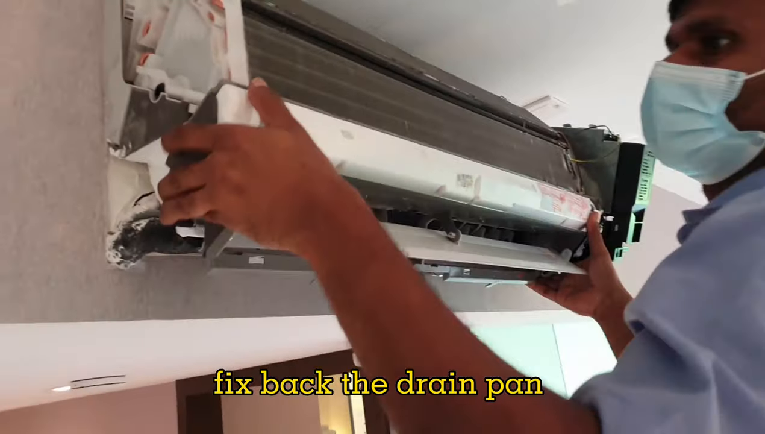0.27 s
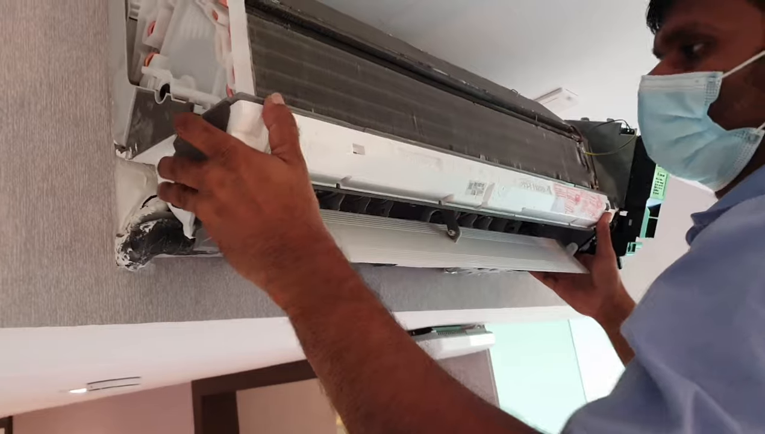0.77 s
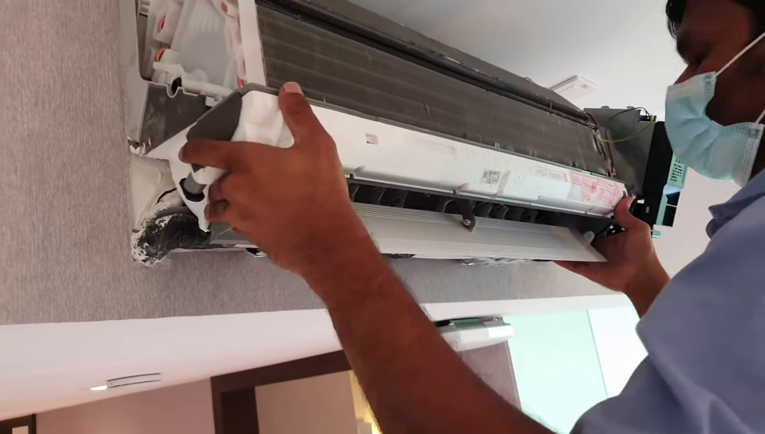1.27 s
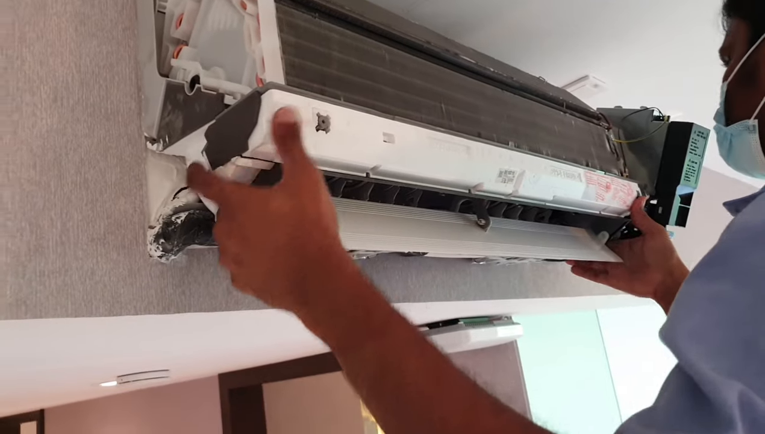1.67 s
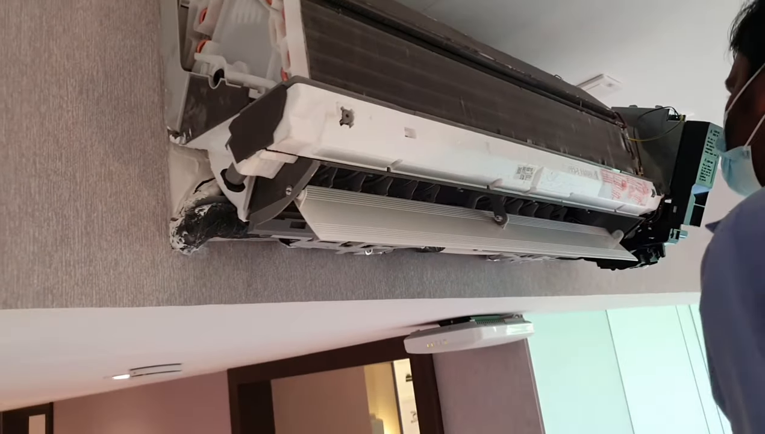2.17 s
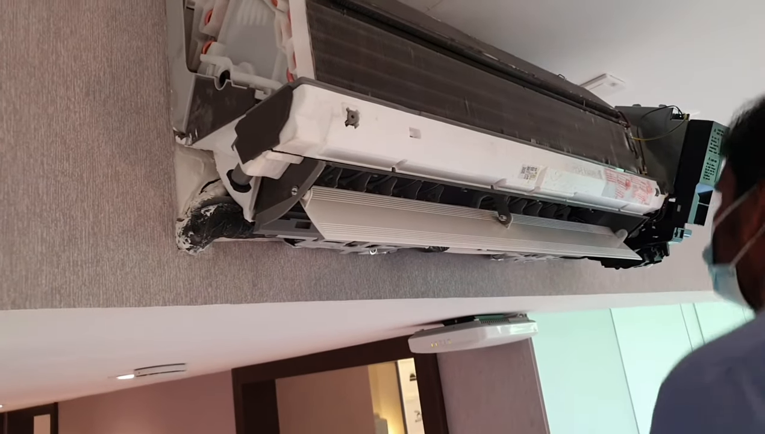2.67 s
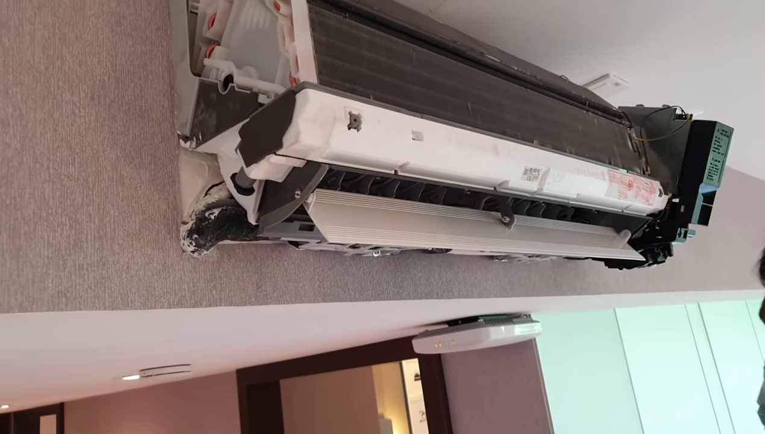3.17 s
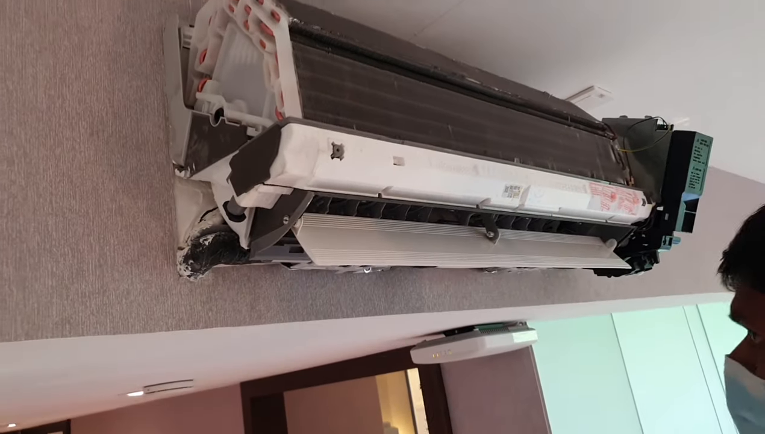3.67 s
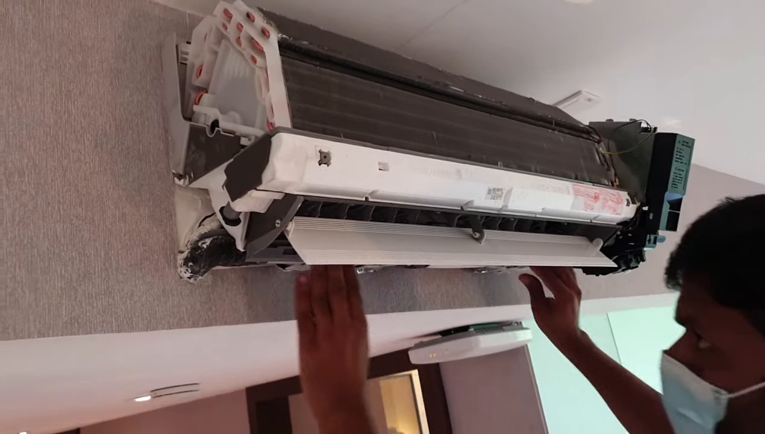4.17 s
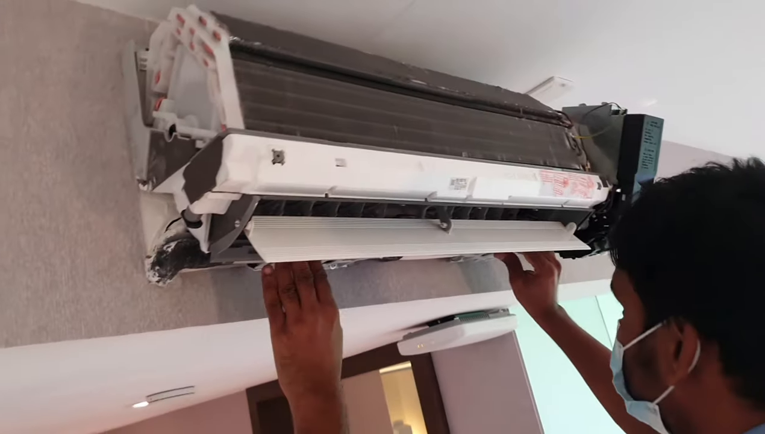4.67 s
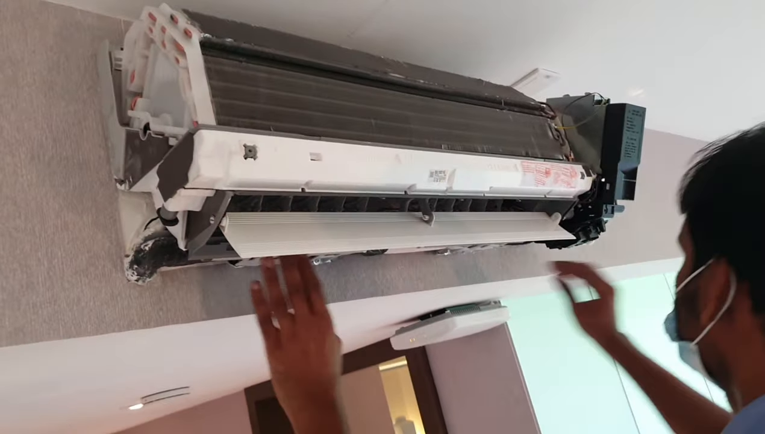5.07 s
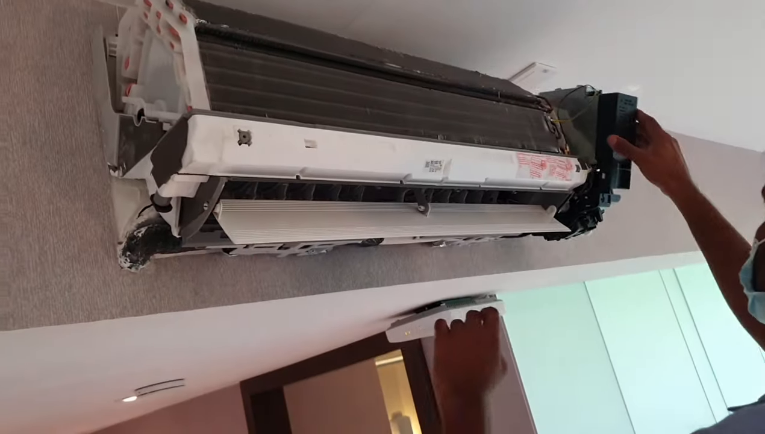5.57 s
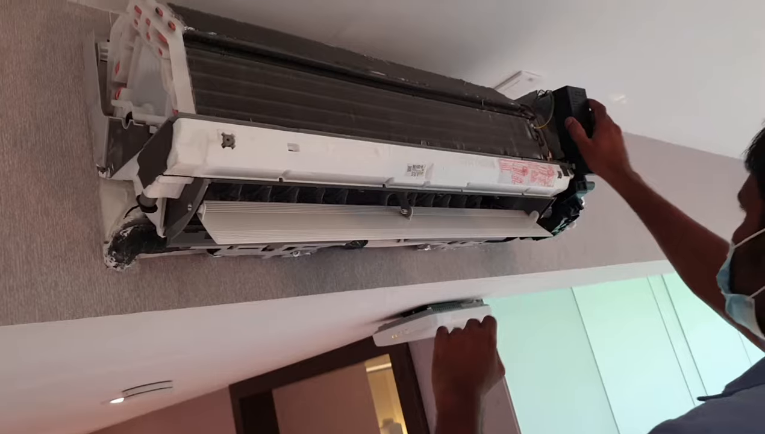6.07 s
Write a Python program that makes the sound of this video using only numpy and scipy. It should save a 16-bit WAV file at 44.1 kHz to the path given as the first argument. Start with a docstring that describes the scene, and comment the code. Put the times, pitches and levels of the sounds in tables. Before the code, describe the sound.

Close to the microphone, plastic casing parts clack and snap hard, with body booms and a grainy scrape, then settle into tiny creaking ticks. After a quiet gap, a ladder knocks dully as weight shifts, with shuffling rubs. Soft fingertip taps and small clicks end it. A wavering low hum and faint hiss lie beneath, in a short live room reverberation, brighter on the left.

```python
"""In a hard-walled room, a plastic drain pan is pushed and snapped into a wall air conditioner, then pressed
and fingered along its edge. Contacts are noise bursts filtered by casing modes; rubs are grainy friction noise.
A metal part pings and low modes boom under shoves; the fitter's stepladder knocks as he shifts his weight.
A wavering low hum and shaped noise lie beneath, with diffuse tails; most of the spectrum is louder on the left."""
import sys
import numpy as np
from scipy import signal
from scipy.fft import rfft, irfft, next_fast_len
from scipy.io import wavfile
from scipy.ndimage import map_coordinates

SR = 44100
rng = np.random.default_rng(int(sys.argv[2]) if len(sys.argv) > 2 else 0)


def inscribe(sig):
    """Save sig as 16-bit PCM at rate SR to the path in sys.argv[1].

    A 1-D sig is mono; a 2-D sig holds one channel per row.
    Samples are clipped to [-1, 1] before scaling.
    """
    pcm = np.round(np.clip(np.atleast_2d(sig).T, -1, 1) * 32767)
    wavfile.write(sys.argv[1], SR, pcm.astype(np.int16))


N = 278712
T = np.arange(int(0.7 * SR)) / SR  # time axis of one event and its tail (s)

# Bands in which contact levels are set: lower edge f/Hz, upper edge f/Hz
BANDS_HZ = [(205, 700), (700, 2000), (2000, 6000), (6000, 15500)]
# Resonances of the casing: f/Hz, width/Hz, relative level/dB
CASING_MODES = [(329, 6.1, -5.5), (445, 65, 4.5), (590, 8, 0), (764.6, 21, -6), (938, 38, -3.5),
                (1120, 140, -2), (1308, 190, 0.5), (1576, 230, -1), (1860, 40, -3.5), (2075, 45, -5.5),
                (2330, 230, -7.5), (2730, 55, -7.5), (3020, 150, -5.5), (3420, 720, -5)]

BAND_OCTAVES = np.log2(np.sqrt(np.prod(BANDS_HZ, axis=1)) / 1950)  # band centres, octaves from 1950 Hz
BAND_FILTERS = [signal.butter(4, edges, "band", fs=SR, output="sos") for edges in BANDS_HZ]


def amp(db):
    """Amplitude ratio of a level: twenty decibels are a factor of ten."""
    return 10 ** (np.asarray(db) / 20)


def rms(x):
    """Root mean square: the effective amplitude of a signal."""
    return np.sqrt(np.mean(x ** 2) + 1e-20)


def along(points, hz):
    """Linear interpolation of (f/Hz, value) points on a logarithmic frequency axis."""
    f, values = np.transpose(points)
    return np.interp(np.log(hz + 1), np.log(f), values)


def add(track, s, x):
    """Superposition: sounds sum linearly; x joins the track at time s."""
    start = max(0, round(s * SR))
    track[:, start:start + x.shape[-1]] += x[..., :N - start]


def wobble(rate):
    """Band-limited random fluctuation: a smooth curve through rate random knots a second."""
    knots = rng.standard_normal(int(N * rate / SR) + 4)
    return map_coordinates(knots, [np.arange(N) * rate / SR])


def filtered(x, response):
    """Linear filtering: the spectrum is multiplied by a complex frequency response."""
    n = x.shape[-1]
    padded = next_fast_len(n + 4096)
    spectrum = rfft(x, padded) * response(np.fft.rfftfreq(padded, 1 / SR))
    return irfft(spectrum, padded)[..., :n]


def resonances(modes, f):
    """Modal superposition: the causal response of damped resonators (f/Hz, width/Hz, level/dB)."""
    response = 0
    for centre, width, db in modes:
        damping = 1j * f * width
        response = response + amp(db) * damping / (centre * centre - f * f + damping)
    return response


def spread(pair):
    """Interchannel coherence: two unrelated signals become a left and right alike to a set degree."""
    # likeness of left and right: f/Hz, coherence
    coherence = [(100, 1), (250, 0.35), (500, 0.99), (1500, 0.13), (10000, 0.24)]

    def mid_side_gains(hz):
        angle = np.arccos(np.clip(along(coherence, hz), -1, 1)) / 2
        return np.array([np.cos(angle), np.sin(angle)])

    mid, side = filtered(pair, mid_side_gains)
    return np.array([mid + side, mid - side])


def room_tail():
    """Diffuse reverberation: unit-energy noise builds up in milliseconds and dies sooner in the treble."""
    # the room's decay: f/Hz, t60/s
    room_decay = [(200, 0.63), (600, 0.51), (2500, 0.44), (6000, 0.42), (14000, 0.36)]
    hz, t, noise = signal.stft(rng.standard_normal((2, len(T))), SR, nperseg=256)
    buildup = 1 - np.exp(-t / 0.0012)
    decay = amp(-60 * t / along(room_decay, hz)[:, None])
    tail = signal.istft(noise * decay * buildup, SR, nperseg=256)[1][:, :len(T)]
    return tail / np.linalg.norm(tail[0])


def in_room(x, wet_db):
    """Convolution reverberation: x is joined by its response in a freshly drawn tail."""
    reverb = signal.fftconvolve(x, room_tail(), axes=1)[:, :len(T)]
    return spread(x + amp(wet_db) * reverb)


def strike(t60, rise, wet_db):
    """High modal density: a struck panel is quickly damped noise, melting into the room's tail."""
    envelope = amp(-60 * T / t60) * (1 - np.exp(-T / rise))
    burst = rng.standard_normal((2, len(T))) * envelope
    return spread(burst / np.linalg.norm(burst[0]) + amp(wet_db) * room_tail())


def band_levels(db, tilt_db, arch_db):
    """Contact spectrum: the level is tilted by hardness and arched over the middle bands."""
    curvature = BAND_OCTAVES ** 2 - np.mean(BAND_OCTAVES ** 2)
    return db + tilt_db * BAND_OCTAVES - arch_db * curvature


def coloured(x, levels_db, length):
    """Band equalization: each band is set to its level over the first length seconds."""
    out = 0
    for db, sos in zip(levels_db, BAND_FILTERS):
        band = signal.sosfilt(sos, x)
        out = out + amp(db) * band / rms(band[:, :int(length * SR)])
    return out


def background():
    """Amplitude and phase modulation: a low tone wavers over spectrally shaped rumble and hiss."""
    # slow swell of the hum, before a lift of 4.5 dB: t/s, level/dB
    hum_swell = [(0.0, -42), (2.15, -46.5), (3.1, -39.5), (4.3, -45), (4.8, -41.5), (6.32, -43.5)]
    # room rumble and air, with a faint whistling band near 2.3 kHz: f/Hz, relative level/dB per Hz
    air_spectrum = [(20, -34), (35, -9), (52, 1.5), (90, -3), (110, -1.5), (138, -9.5), (320, -18),
                    (520, -23), (800, -29.5), (1000, -34.5), (2120, -43), (2340, -37), (2580, -47),
                    (16000, -57)]
    hum_hz = 76.2
    s, db = np.transpose(hum_swell)
    t = np.arange(N) / SR
    waver = amp(1.8 * wobble(11))
    phase = 2 * np.pi * hum_hz * t + 0.56 * wobble(5.8)
    hum = amp(np.interp(t, s, db) + 4.5) * waver * np.sin(phase)
    air = filtered(spread(rng.standard_normal((2, N))), lambda hz: amp(along(air_spectrum, hz)))
    return hum + amp(-44) * air / rms(air)


def knocks():
    """Impact on a hollow frame: a dull stepladder burst is joined by one note that rings on."""
    # knocks of the stepladder: t/s, clack level/dB, tilt/dB per octave, note level/dB, ring f/Hz
    knock_events = [(2.494, -44, 0, -42, 626), (2.861, -63, -4.5, -56, 1313), (3.057, -41, -3.5, -34, 761),
                    (3.091, -50.5, -3.5, -32.5, 750), (3.137, -43.5, -4, -37, 564),
                    (3.254, -62, -11, -30.5, 483), (3.603, -56, -6, -52.5, 1170),
                    (3.645, -45.5, 0.5, -31, 620), (3.7498, -37, 1.84, -32, 1190),
                    (3.935, -58, -2.5, -63.5, 1316), (3.999, -59.5, -7.5, -36.5, 479),
                    (5.849, -58.5, -7.5, -46, 574)]
    # resonances of the ladder's frame: f/Hz, width/Hz, relative level/dB
    ladder_modes = [(831, 125, -6.5), (1190, 170, -0.5), (1520, 79, -6), (1905, 23, -23), (2260, 46, -14)]
    arch_db, note_t60_s = 1.5, 0.25  # arch in dB per octave squared
    out = np.zeros((2, N))
    for s, db, tilt_db, note_db, ring_hz in knock_events:
        body = [(ring_hz, 110, -3), *ladder_modes]
        thud = filtered(strike(t60=0.11, rise=0.00093, wet_db=1.5), lambda f: 0.19 + resonances(body, f))
        clack = coloured(thud, band_levels(db, tilt_db, arch_db), length=0.013)
        note_envelope = amp(note_db - 60 * T / note_t60_s) * (1 - np.exp(-T / 0.00048))
        note = np.sin(2 * np.pi * ring_hz * T) * note_envelope
        add(out, s, clack + note)
    return out


def pings():
    """Narrow-band resonance and beating: a brief noise burst rings the metal part's close modes."""
    # strikes on the metal part: t/s, level/dB
    ping_events = [(0.0878, -25)]
    # resonances of the metal part: f/Hz, width/Hz, relative level/dB
    metal_modes = [(1642, 45, -16.5), (2481, 83, -10.5), (4140, 14, -15), (4570, 13, -1), (4590, 14, -2),
                   (9100, 330, -18.5), (13750, 280, -19)]
    out = np.zeros((2, N))
    for s, db in ping_events:
        ring = filtered(strike(t60=0.078, rise=0.0013, wet_db=-8.0), lambda f: resonances(metal_modes, f))
        add(out, s, amp(db) * ring / rms(ring[:, :int(0.02 * SR)]))
    return out


def booms():
    """Free decay of low modes: each shove rings the unit at slightly new modal strengths."""
    # shoves that make the whole unit boom: t/s, level/dB
    shove_events = [(0.095, -31.5), (0.156, -25), (0.312, -15.5), (0.367, -27), (0.543, -27), (3.161, -30)]
    # low modes of the unit on its wall plate: f/Hz, mean relative level/dB, t60/s
    plate_modes = [(53, -9.5, 0.28), (73, -1, 0.23), (92.6, 4, .2), (112, -3, 0.082), (147, -7.5, 0.12)]
    onset = 1 - np.exp(-T / 0.0078)
    out = np.zeros((2, N))
    for s, db in shove_events:
        ring = np.zeros(len(T))
        for hz, level, t60 in plate_modes:
            mode_db = level + rng.normal(0, 1.3)
            ring += amp(mode_db - 60 * T / t60) * np.sin(2 * np.pi * hz * T)
        add(out, s, amp(db) * ring * onset)
    return out


def rubs():
    """Stick-slip friction: sliding surfaces catch and slip in tiny uneven grains."""
    # strokes of sliding plastic, hands and soles: start t/s, end t/s, level/dB, tilt/dB per octave
    strokes = [(0.0, 0.059, -60, 1.5), (0.043, 0.09, -50, 1), (0.189, 0.282, -50.5, -4.5),
               (0.432, 0.503, -30, -2.15), (0.682, 0.946, -58.5, -1), (0.94, 1.07, -69, 1.2),
               (1.052, 1.203, -61.5, 2.5), (1.189, 1.323, -55, 0.6), (1.338, 1.555, -63.5, -3),
               (1.564, 1.783, -75, 4.5), (2.402, 2.547, -66, -1), (2.594, 3.085, -69.5, -1),
               (2.785, 2.835, -55, 1.5), (3.064, 3.093, -42.5, -1), (3.174, 3.213, -50, -2),
               (3.233, 3.384, -54.5, 0.7), (3.417, 3.466, -57.5, 0.7), (3.617, 3.736, -44.5, 1.14),
               (3.737, 3.781, -40, 2.1), (4.364, 4.396, -54.5, 1.5), (4.526, 4.724, -67.5, -3),
               (4.733, 4.813, -57.5, 0.5), (5.463, 5.556, -63.5, -1.5), (5.928, 5.978, -59.5, -1),
               (6.193, 6.322, -59.5, 0)]
    slips_per_s, slip_scatter_db, grain_decay_s = 1200, 3.3, 0.00078
    arch_db = 0.64  # dB per octave squared
    out = np.zeros((2, N))
    for start, end, db, tilt_db in strokes:
        length = max(end - start, 0.01)
        press = np.clip(T / (0.092 * length), 0, 1)
        release = np.clip((length - T) / (0.28 * length), 0, 1)
        slip_sizes = amp(slip_scatter_db * rng.standard_normal(len(T)))
        slips = (rng.random(len(T)) < slips_per_s / SR) * slip_sizes
        grains = signal.lfilter([1], [1, -np.exp(-1 / (grain_decay_s * SR))], slips)
        friction = rng.standard_normal((2, len(T))) * press * release * (1.3 + grains)
        shell = filtered(friction, lambda f: 1.0 + resonances(CASING_MODES, f))
        levels_db = band_levels(db, tilt_db, arch_db)
        add(out, start, coloured(in_room(shell, wet_db=-3.0), levels_db, length))
    return out


def creak_ticks(count):
    """Stick-slip creaking: each creak is a run of count tiny snaps, as rows like the snap table's."""
    # creaks of the pan as it is pressed home: start t/s, end t/s, mean tick level/dB
    creaks = [(0.782, 0.927, -59), (1.047, 1.16, -61.5), (1.159, 1.315, -60), (1.411, 1.517, -59.5)]
    scatter_db, tilt_db, t60_s = 3, 3, 0.012  # tilt in dB per octave
    ticks = []
    for start, end, db in creaks:
        times = start + (end - start) * (np.arange(count) + rng.random(count)) / count
        sizes_db = db + scatter_db * (2 * rng.random(count) - 1)
        ticks += [(s, size_db, tilt_db, t60_s) for s, size_db in zip(times, sizes_db)]
    return ticks


def snaps():
    """Impulsive excitation: each catch cracks, rings the casing's modes and excites the room."""
    # plastic catches and edges meeting; hard contacts tilt bright, padded ones dull:
    # t/s, level/dB, tilt/dB per octave, contact t60/s
    catches = [(0.043, -50, -0.2, .052), (0.0873, -32.5, -1, .044), (0.2128, -43, -3.5, .075),
               (0.221, -41, 1.5, .033), (0.228, -46, -2, 0.024), (0.2983, -35.5, -2, 0.11),
               (0.3051, -29.5, -5, 0.028), (0.317, -41.5, -7, 0.026), (0.4469, -20, 0, .034),
               (0.486, -42.5, -5, 0.075), (0.539, -24, -2.16, 0.029), (0.566, -41, -4, 0.026),
               (0.851, -53.5, 3, .05), (1.254, -54, -7, 0.077), (1.482, -53.5, .5, .03),
               (1.6798, -62, 5, .016), (1.7429, -56, 3, 0.014), (1.945, -75.5, 6, .019),
               (4.2703, -51.5, 3, 0.046), (4.3295, -55, 1.5, 0.038), (4.3583, -55.5, 3, 0.02),
               (4.3803, -52, -4, 0.128), (4.4174, -51.5, -7.5, .09), (4.812, -46, -0.7, 0.043),
               (4.9705, -59, -4, 0.025), (4.979, -49.5, -4, 0.18), (5.6414, -50.5, -1.5, 0.046),
               (5.6945, -43, 2.5, .021), (5.917, -58, -5.5, 0.022), (5.9456, -49.5, -1, .029),
               (6.1427, -60, -2.5, 0.0156), (6.2408, -43, -3, 0.043)]
    # all contacts share nearly one arch (dB per octave squared); it grows only imperceptibly below firm_db
    base_arch_db, firm_db, arch_growth_per_db = 1.05, -39, 0.0019
    out = np.zeros((2, N))
    for s, db, tilt_db, t60 in [*catches, *creak_ticks(count=6)]:
        crack = strike(t60, rise=0.00033, wet_db=-5.0)
        shell = filtered(crack, lambda f: 0.52 + resonances(CASING_MODES, f))
        arch_db = base_arch_db + arch_growth_per_db * max(firm_db - db, 0)
        add(out, s, coloured(shell, band_levels(db, tilt_db, arch_db), length=0.012))
    return out


def scene():
    """Superposition of the handwork on the room's hum."""
    return background() + knocks() + pings() + booms() + rubs() + snaps()


def record(dry):
    """Port resonance, interchannel delay and saturation: peaks are rounded, then the band is limited."""
    # unlike resonances of the two microphone ports: f/Hz, left level/dB, right level/dB
    ports = [(100, -0.5, -5), (450, 0.5, -4.5), (1180, 1.5, -6.5), (2700, 3, -5.5), (4135, 2.5, -6.5),
             (6900, 0, -16.5), (7500, -1, -19), (10000, 1.5, 2), (12300, -1, -6.5), (15500, -3.5, -12.5)]
    left_lag_s, top_hz = 0.00003, 15700  # the left port's signal arrives later by this lag
    hz, *sides_db = np.transpose(ports)

    def port_response(f):
        colour = amp([along(np.column_stack([hz, db]), f) for db in sides_db])
        return colour * np.exp(1j * np.pi * left_lag_s * np.array([-f, f]))  # half the lag on each side

    heard = filtered(dry, port_response)
    rounded = heard / (1 + np.abs(heard) ** 6) ** (1 / 6)
    return filtered(rounded, lambda f: f < top_hz)


dry = scene()
out = record(dry)
inscribe(out)
```